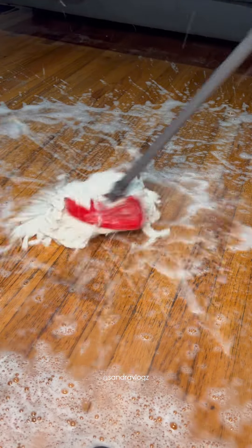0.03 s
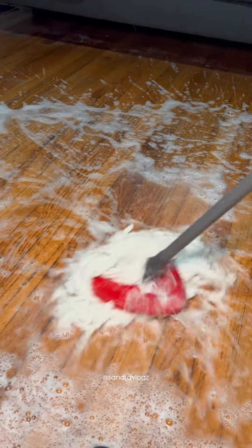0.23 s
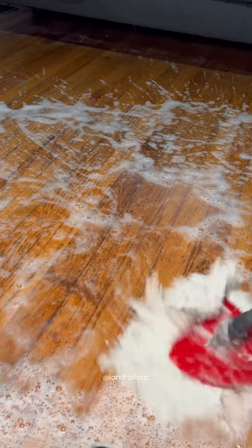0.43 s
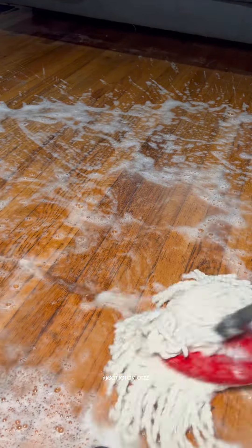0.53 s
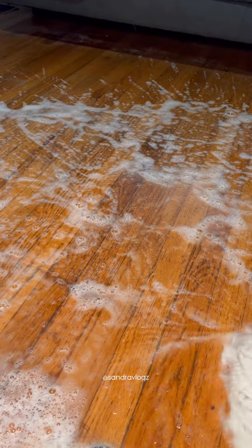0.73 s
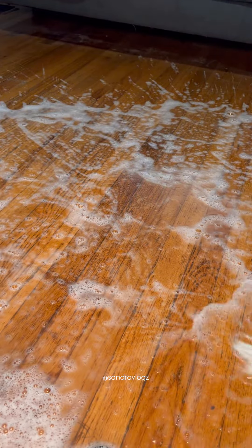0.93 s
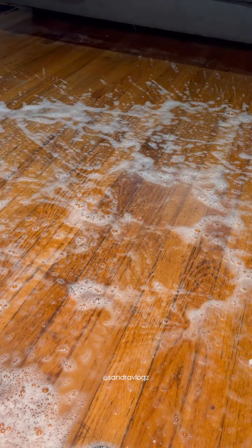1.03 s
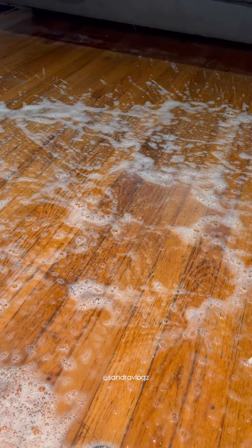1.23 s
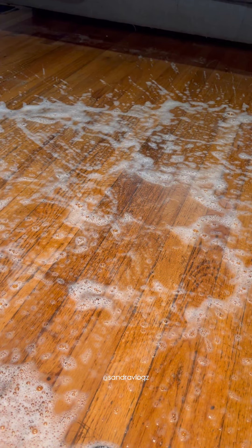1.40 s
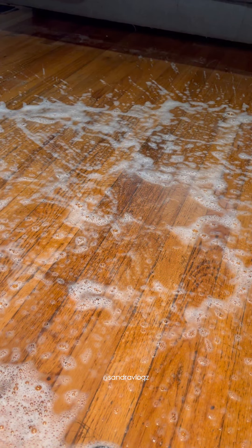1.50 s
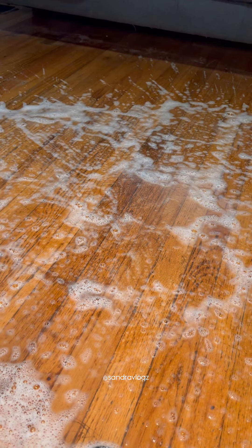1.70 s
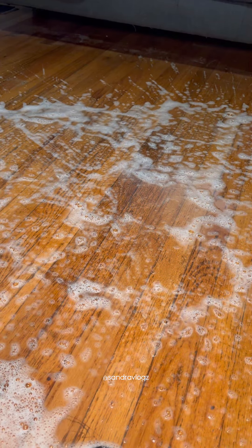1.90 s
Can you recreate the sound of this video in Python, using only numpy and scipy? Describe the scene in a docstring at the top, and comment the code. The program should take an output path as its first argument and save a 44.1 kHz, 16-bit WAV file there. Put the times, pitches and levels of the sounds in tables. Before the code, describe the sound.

A wet string mop slaps on soapy floorboards: the tail of an earlier slap opens, then sharp splashy hits at 0.13, 0.40 (brightest) and 0.67 seconds, each with popping water, spray and a low wooden boom. Soft knocks and a weak wet pat follow at 0.8-0.9. Then near quiet, faint hiss and hum, a barely audible squeak at 1.05, bubble ticks near 1.7, and a small slap from another side at 1.85. Close, short room tail.

```python
"""A soaked string mop slaps down on soapy floorboards in a quiet room, several times, then faintly from another side.
Each slap is a spray of filtered noise and ringing drops; gliding tones are pops of trapped air and two soft
knocks that sag in pitch. Fading sine waves make the booms of the boards, their short echoes and soft knocks.
Shaped noise makes the hiss of suds, a thin squeak and bursting bubbles; a weakening sine is the mains hum.
A phone hears it all through two microphone ports close to the floor."""
import sys
import numpy as np
from scipy import signal
from scipy.fft import rfft, irfft, next_fast_len
from scipy.io import wavfile
from scipy.ndimage import uniform_filter1d

SR = 44100
rng = np.random.default_rng(int(sys.argv[2]) if len(sys.argv) > 2 else 0)


def unload_audio(sound):
    """Save the sound as a 16-bit wav file, at the path given as the first command line argument."""
    columns = np.transpose(np.atleast_2d(sound))
    # keep every value between -1 and 1, then stretch to whole-number steps
    steps = np.round(np.clip(columns, -1, 1) * 32767)
    wavfile.write(sys.argv[1], SR, steps.astype(np.int16))


N = 85995
T = np.arange(N) / SR  # time of each sample, s
HZ = np.fft.rfftfreq(N, 1 / SR)  # frequencies that the filters work on
TURN_S = 1.838  # from here on, the last slap comes from another side


def undb(db):
    """Turn dB into a gain."""
    return 10 ** (np.asarray(db) / 20)


def unit(x):
    """Scale to an rms (average strength) of 1."""
    return x / np.sqrt(np.mean(x ** 2))


def shape(table):
    """Read a table of (f/Hz, value) at every frequency, along a log axis."""
    hz, values = np.array(table).T
    return np.interp(np.log(HZ + 1), np.log(hz), values)


def colour(x, gain):
    """Filter by a gain per frequency, padded so that the end does not wrap round to the start."""
    size = next_fast_len(N + 4096, True)
    gain_places = np.arange(size // 2 + 1) * N / size
    wide_gain = np.interp(gain_places, np.arange(len(gain)), gain)
    return irfft(rfft(x, size) * wide_gain, size)[:N]


def noise_band(hz, width):
    """Noise gathered around one frequency, with an rms of 1."""
    return unit(colour(rng.standard_normal(N), np.exp(-((HZ - hz) / width) ** 2)))


def split(x, hz):
    """Part a sound into what lies under and over hz; the two add up to the whole."""
    low = colour(x, 1 / (1 + (HZ / hz) ** 4))
    return low, x - low


def bands(x):
    """Part a sound into bass, middle, low treble and top."""
    out = []
    for edge_hz in (489, 2110, 3980):
        low, x = split(x, edge_hz)
        out.append(low)
    return out + [x]


def fade(t, t60):
    """Silent before t = 0, then dying away by 60 dB in t60 seconds."""
    return (t >= 0) * np.exp(-np.log(1000) * np.clip(t, 0, None) / t60)


def ring(t, hz, t60, swell):
    """One way a solid body vibrates: a sine that swells up and dies away."""
    onset = 1 - np.exp(-np.clip(t, 0, None) / swell)
    return fade(t, t60) * onset * np.sin(2 * np.pi * hz * t)


def boards():
    """Slaps ring the floor's low modes over a loose rumble, with soft knocks and short echoes of the booms."""
    # booms of the boards: t/s, low mode level/dB, upper pair level/dB
    booms = [(-.1, -21.5, -21), (0.1347, -18.5, -17), (0.404, -18, -16), (0.67, -25.5, -33),
             (0.866, -31.5, -37.5), (0.999, -44, -68.5)]
    # floor modes, the low one and then the upper pair: f/Hz, level against the boom/dB, t60/s, swell/s
    modes = [(73.77, 1, 0.53, 0.011), (143.4, 3.5, 0.24, 0.008), (105.3, -6, 0.28, .005)]
    # soft knocks, and short echoes of the booms at 0.16 and 0.427 s: t/s, level/dB, f/Hz, t60/s
    knocks_and_echoes = [(0.16, -16.5, 87.4, 0.23), (0.427, -21, 90.5, 0.043), (0.4033, -11.5, 165, 0.067),
                         (0.674, -27, 182, 0.092), (.838, -24, 273, 0.032), (0.868, -33, 109, 0.28),
                         (1.269, -46.5, 226.5, 0.12), (1.713, -45.5, 132, 0.34), (1.753, -49.5, 52, 0.21),
                         (1.864, -36.5, 130, 0.27), (1.885, -42.5, 242, 0.53)]
    knock_swell_s = .0005
    rumble_db, rumble_t60_s = -10, .45  # level against the low mode
    out = sum(undb(db) * ring(T - s, hz, t60, knock_swell_s) for s, db, hz, t60 in knocks_and_echoes)
    rumble = noise_band(52, 15)
    for s, low_db, upper_db in booms:
        rumble_level = uniform_filter1d(fade(T - s, rumble_t60_s), size=800)  # softened start
        out = out + undb(low_db + rumble_db) * rumble * rumble_level
        for (hz, db, t60, swell), hit_db in zip(modes, (low_db, upper_db, upper_db)):
            out = out + undb(hit_db + db) * ring(T - s, hz, t60, swell)
    return out


def slap_power():
    """Power of each slap in four bands: it rises as the strings land and then dies away."""
    # wet slaps: t of the peak/s, middle level/dB, rise/s, fall t60/s,
    # then against the middle level: bass/dB, low treble/dB, top/dB
    slaps = [(-.03, -29, 0.0067, 0.31, 2.5, 3.5, -4), (.129, -19.5, 0.0015, 0.0097, 8.5, 13, 10),
             (0.153, -23, 0.011, 0.067, 8.5, 10, 2.5), (0.195, -23.5, 0.014, 0.067, 1, 1, -6.5),
             (.262, -31.5, 0.0093, 0.21, 3.5, -4.5, -10), (0.351, -45, 0.0087, 0.044, -5, -6, 6),
             (0.402, -9, 0.0053, 0.032, -8, -11, -5), (0.411, -37, 0.0072, 0.21, -28, 18.5, 12),
             (.51, -34.5, 0.025, 0.17, -1, -7, -8), (.662, -21, 0.0042, 0.075, -4, -16, 1),
             (0.671, -18, 0.0062, 0.081, -5, -1.5, 0), (0.685, -25, 0.0094, 0.16, -2.5, 2.5, -16),
             (0.795, -39, 0.01, 0.26, 5.5, -4, -28), (0.832, -44, 0.00043, 0.37, 7, 5, 9),
             (.909, -31.5, 0.0065, 0.034, 1, -5.5, -11), (1.283, -45, 0.018, 0.38, 6, -3, -10),
             (1.706, -57.5, .004, 0.25, 14, -12.5, -10), (1.845, -31.5, 0.0012, 0.022, -11, 3, 3.5),
             (1.855, -30, 0.0062, 0.087, 3.5, 0, -0.5)]
    out = 0
    for s, db, rise, t60, bass_db, treble_db, top_db in slaps:
        rising = (T < s) * np.exp(np.clip(T - s, None, 0) / rise)
        band_db = db + np.array([[bass_db], [0], [treble_db], [top_db]])
        out = out + ((rising + fade(T - s, t60)) * undb(band_db)) ** 2
    return out


def drops():
    """Drops and bubbles of many sizes, each ringing a few cycles; even in power per Hz."""
    ring_cycles = 14  # cycles until a ring has fallen by 60 dB
    drops_per_cycle, scatter_db = .03, 12.5  # at each pitch; range of drop levels
    out = 0
    for hz in np.geomspace(450, 15000, num=36):
        chance = rng.random((2, N))
        hits = (chance[0] < drops_per_cycle * hz / SR) * undb(scatter_db * chance[1])
        pole = np.exp((2j * np.pi - np.log(1000) / ring_cycles) * hz / SR)
        ringing = signal.lfilter([1], [1, -pole], hits).imag
        out = out + np.sqrt(hz) * unit(ringing)
    return unit(out)


def grains():
    """Wet grains: fine spray as plain noise, mixed with ringing drops."""
    drops_db = 1.5  # against the spray
    return unit(rng.standard_normal(N) + undb(drops_db) * drops())


def splash(power, glide):
    """Grains of water in four bands, each with the room's diffuse tail of slaps and glides."""
    # colour of the wet grains: f/Hz, relative level per Hz/dB
    grain_colour = [(70, -27.5), (250, 2), (500, 0), (1000, -3), (1900, -4), (2400, -7), (3700, -10),
                    (5000, -10), (7500, -12.5), (10000, -12.5), (13000, -14.5), (14300, -20.5),
                    (16000, -37.5)]
    room_db, room_t60_s = (-8, -7.5, -5.5, -7), (.43, .39, .6, .42)  # one per band
    glide_room_db, turn_room_db = .5, -4  # glides' share of the tail; drier room after the turn
    tone = unit(undb(shape(grain_colour)))
    into_room = undb(2 * turn_room_db * (T > TURN_S))  # doubled dB, as this scales power
    glide_bands = bands(glide)
    out = 0
    for k in range(4):
        band = bands(colour(grains(), tone))[k]
        glide_power = (undb(glide_room_db) * glide_bands[k]) ** 2 / np.mean(band ** 2)
        fed = (power[k] + glide_power) * into_room
        # the room keeps this much of its power from one sample to the next
        keep = np.exp(-2 * np.log(1000) / (room_t60_s[k] * SR))
        tail = signal.lfilter([1 - keep], [1, -keep], fed) * undb(room_db[k]) ** 2
        out = out + band * np.sqrt(power[k] + tail)
    return out


def background():
    """Low rumble and hiss of suds and air as noise in three bands, and a mains hum as a sine."""
    # colour of the room's hush within each band: f/Hz, relative level per Hz/dB
    hush_colour = [(30, -18), (65, -4.5), (100, -5.5), (200, -22), (500, -20.5), (1500, -24.5),
                   (2500, -25.5), (5000, -24), (13000, -23.5), (14300, -34), (15000, -60.5)]
    # level of the hush: t/s, bass/dB, middle/dB, treble/dB
    hush_levels = [(0, -101, -47.5, -69), (0.901, -50.5, -57.5, -60), (1.1, -62, -74.5, -67.5),
                   (1.231, -64, -77.5, -70), (1.451, -64, -66, -67), (1.65, -62, -65, -62.5),
                   (1.797, -54.5, -66, -64.5), (1.95, -60.5, -68, -70)]
    # level of the hum: t/s, rms level/dB
    hum_levels = [(0, -45), (.9, -47.5), (1.2, -58.5), (1.3, -52), (1.68, -54.5), (1.74, -61.5),
                  (1.95, -68.5)]
    hum_hz = 121.3
    s, *levels_db = np.array(hush_levels).T
    bass, rest = split(colour(rng.standard_normal(N), undb(shape(hush_colour))), 150)
    middle, treble = split(rest, 2400)
    hush = sum(unit(x) * undb(np.interp(T, s, db)) for x, db in zip((bass, middle, treble), levels_db))
    hum = np.sqrt(2) * np.sin(2 * np.pi * hum_hz * T)
    return hush + hum * undb(np.interp(T, *np.array(hum_levels).T))


def glides():
    """Pops of trapped air and two soft knocks: a few cycles of a tone sliding down in pitch."""
    # pops of trapped air, and two soft knocks that sag in pitch at 0.802 and 0.837 s:
    # t/s, peak level/dB, start f/Hz, end f/Hz, length/s
    sliding_tones = [(0.1279, -10, 1960, 1370, 0.0031), (.1288, -4.5, 1462, 306, 0.0062),
                     (.3998, -10.5, 1460, 990, 0.0023), (.4025, -12, 2020, 1670, 0.0049),
                     (.6712, -16, 1420, 607, 0.0042), (.802, -28, 185, 152, 0.021),
                     (.837, -27, 200, 106.4, 0.031)]
    out = 0
    for s, db, start_hz, end_hz, length in sliding_tones:
        u = np.clip((T - s) / length, 0, 1)  # runs from 0 to 1 during the tone
        cycles = np.cumsum(start_hz * (end_hz / start_hz) ** u * (u > 0)) / SR
        out = out + undb(db) * np.sin(np.pi * u) * np.sin(2 * np.pi * cycles)
    return out


def squeak():
    """A thin, faint wet squeak: a narrow band of noise that swells and sinks."""
    start_s, length_s, level_db = 1.035, .08, -68
    swell = np.sin(np.pi * np.clip((T - start_s) / length_s, 0, 1))
    return undb(level_db) * noise_band(3070, 130) * swell


def tick():
    """Tiny bubbles burst: very short puffs of high noise."""
    # bursting bubbles: t/s, level/dB
    bursts = [(1.6895, -45), (1.773, -59)]
    fizz = noise_band(12000, 2500)
    return sum(undb(db) * fade(T - s, .01) for s, db in bursts) * fizz


def ports(mono, other, phase, gain):
    """Left and right port: own phase and balance, opposite shares of scattered sound."""
    # balance of the ports: f/Hz, left minus right/dB
    balance = [(150, -0.52), (500, -2), (2300, 0.35), (4000, -1.2)]
    # half of each difference goes to the left port, the opposite half to the right
    lead = np.exp(.5j * np.interp(HZ, *np.array(phase).T)) * undb(shape(balance) / 2)
    return np.array([colour(mono + other, gain * lead), colour(mono - other, gain / lead)])


def scene():
    """Mix all sources for two ports, with a quick crossfade to the other side for the last slap."""
    # phase between the ports: f/Hz, left's lead/rad
    early_phase = [(0, 0), (170, -.03), (650, -.5), (1500, 0), (1900, .75), (2600, 2.6), (3900, 1.3),
                   (5000, 1.9), (5600, 3.2), (7650, 6.3), (17000, 17.94)]
    # the same for the last slap: f/Hz, left's lead/rad
    late_phase = [(0, 0), (1500, -.9), (3200, -.1), (5500, 2.5), (9000, 2), (11200, 3.2), (14800, 6.2)]
    # colour of the last slap's side: f/Hz, gain/dB
    late_colour = [(1500, -2), (2400, 4), (6000, -5), (10000, -1), (13500, -3), (15200, 9.5)]
    # scattered sound that differs between the ports: f/Hz, gain/dB
    diffuse = [(60, -29.5), (150, -21), (500, -7), (1500, -10), (2300, -7.5), (4000, -5), (5000, -1),
               (5600, -11), (6500, -8), (10000, -34), (11500, -18), (16000, -14.5)]
    late_treble_db = 5  # more scatter in the last slap's treble
    power, glide = slap_power(), glides()
    mono = splash(power, glide) + glide + boards() + background() + squeak() + tick()
    other = colour(splash(power, glide) + background(), undb(shape(diffuse)))
    late = np.clip((T - TURN_S) / .0063, 0, 1)
    low, high = split(other * late, 8200)
    late_other = low + undb(late_treble_db) * high
    early_side = ports(mono * (1 - late), other * (1 - late), early_phase, .93)
    late_side = ports(mono * late, late_other, late_phase, undb(shape(late_colour)))
    return early_side + late_side


def record(dry):
    """The phone loses the deepest bass and cuts the top."""
    low_cut_hz, top_hz = 36, 16300
    dry = signal.sosfilt(signal.butter(2, low_cut_hz, "high", fs=SR, output="sos"), dry)
    return signal.sosfilt(signal.ellip(10, .2, 60, top_hz, fs=SR, output="sos"), dry)


dry = scene()
out = record(dry)
unload_audio(out)
```